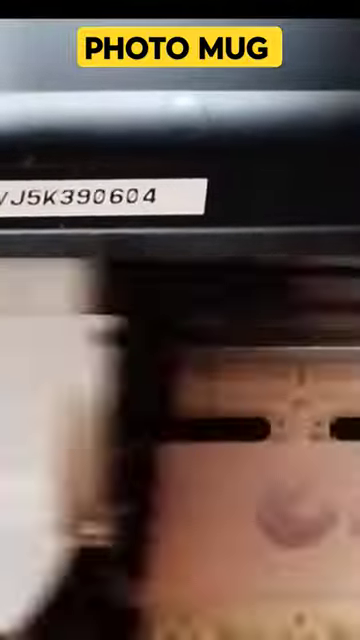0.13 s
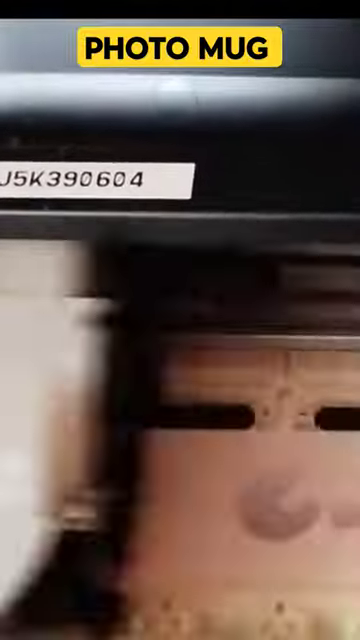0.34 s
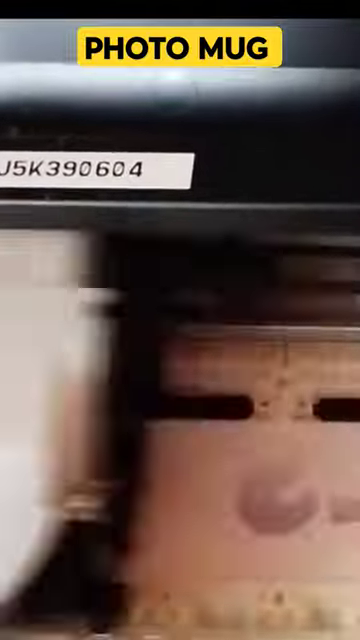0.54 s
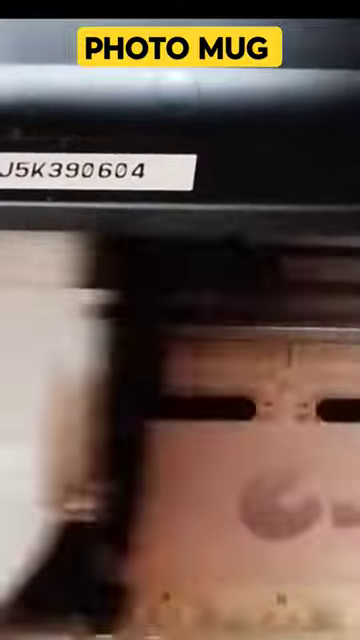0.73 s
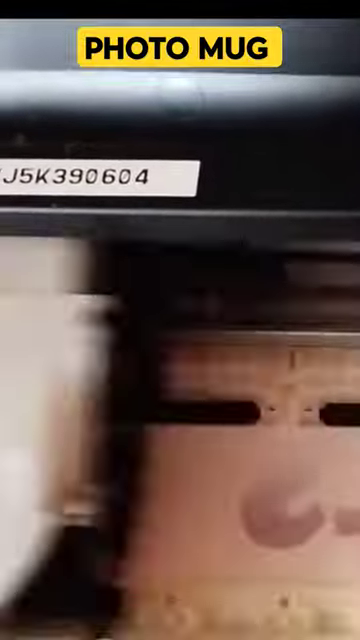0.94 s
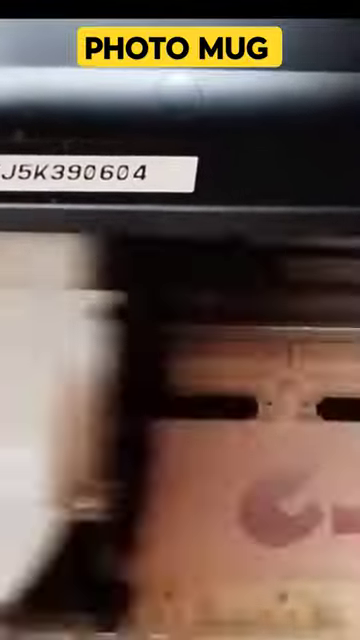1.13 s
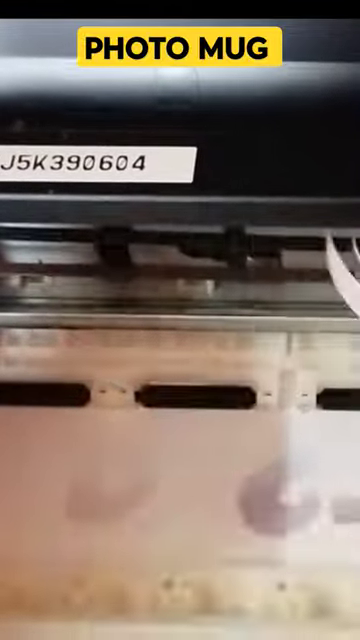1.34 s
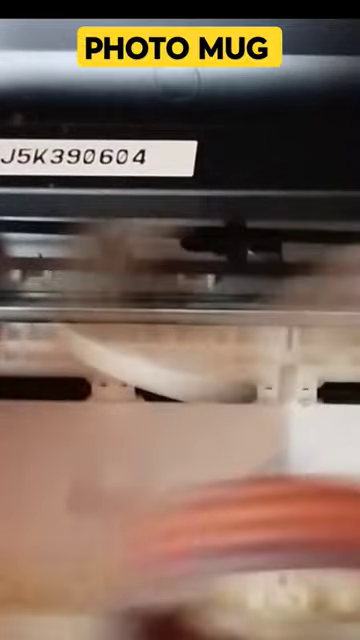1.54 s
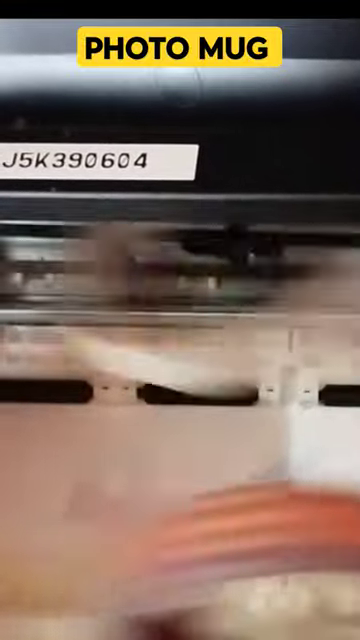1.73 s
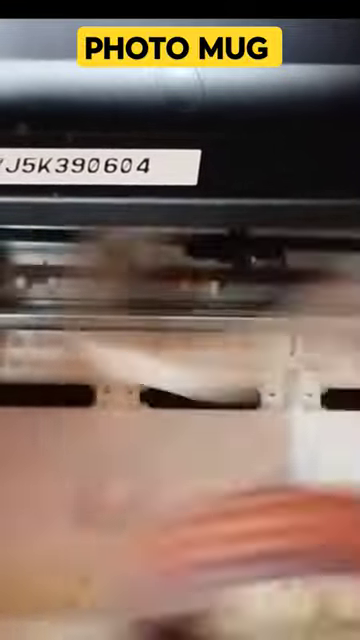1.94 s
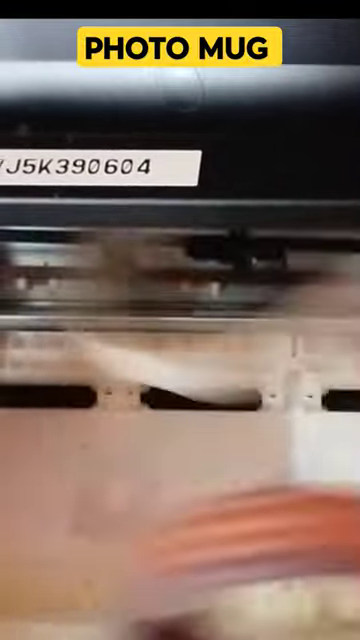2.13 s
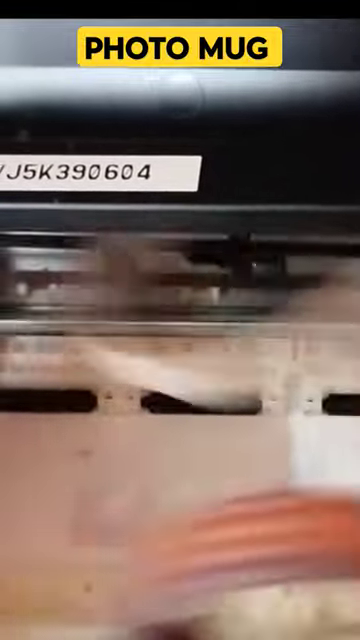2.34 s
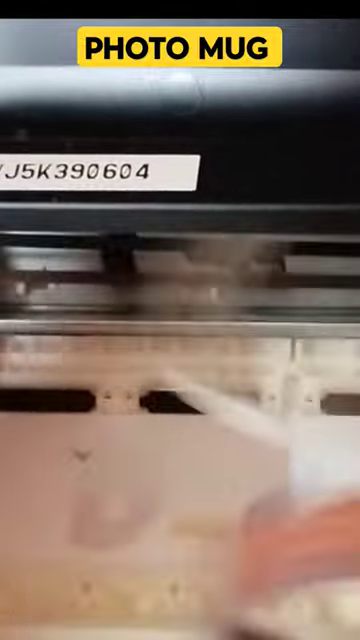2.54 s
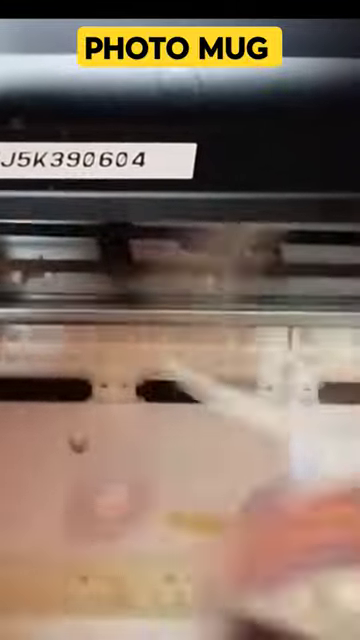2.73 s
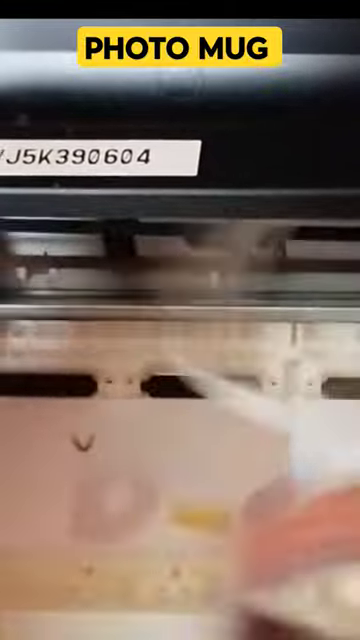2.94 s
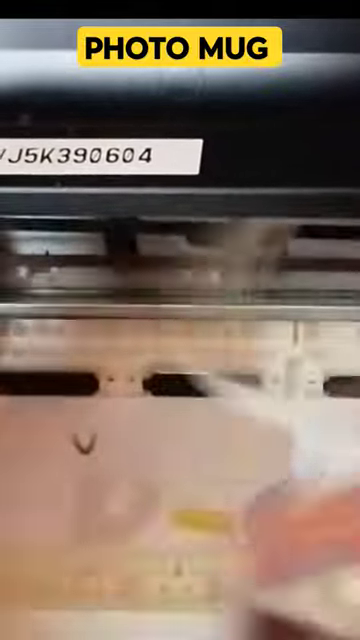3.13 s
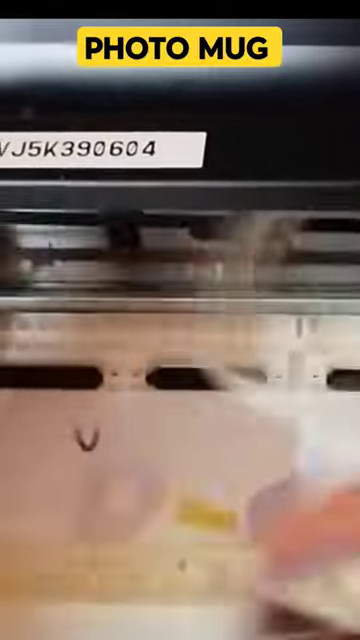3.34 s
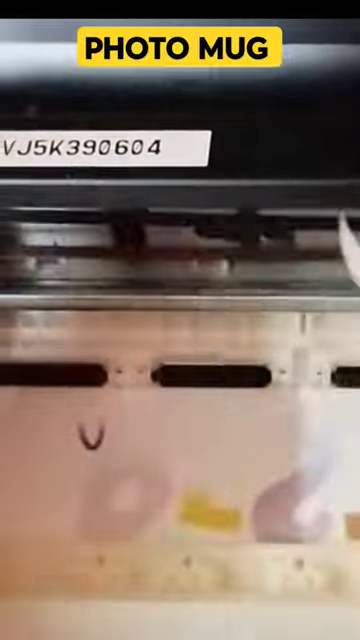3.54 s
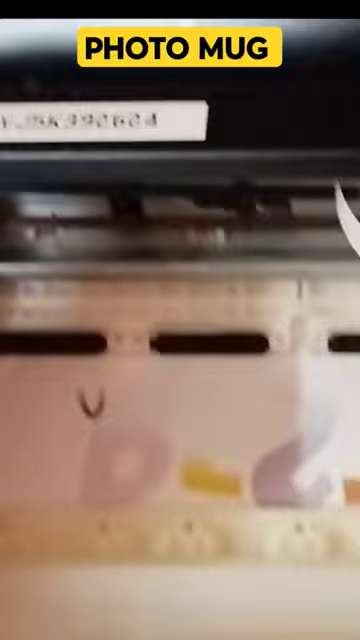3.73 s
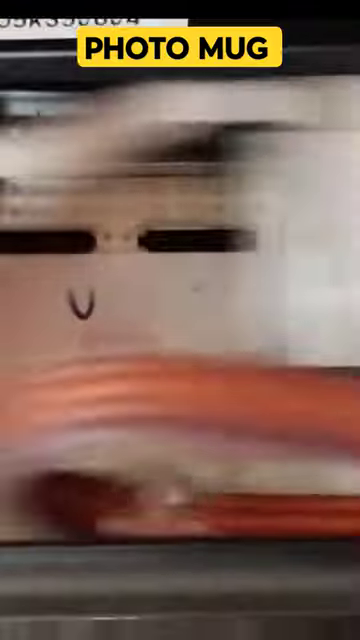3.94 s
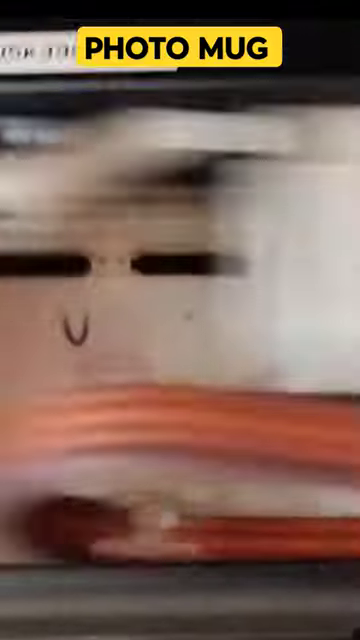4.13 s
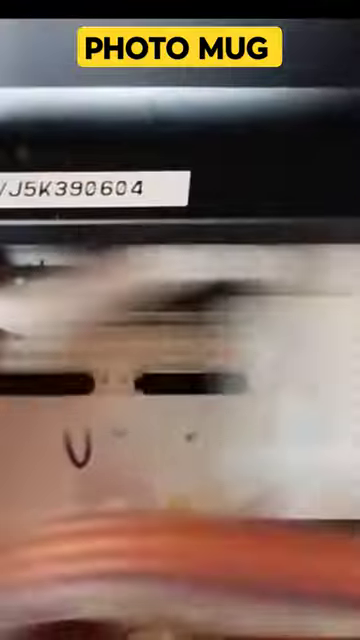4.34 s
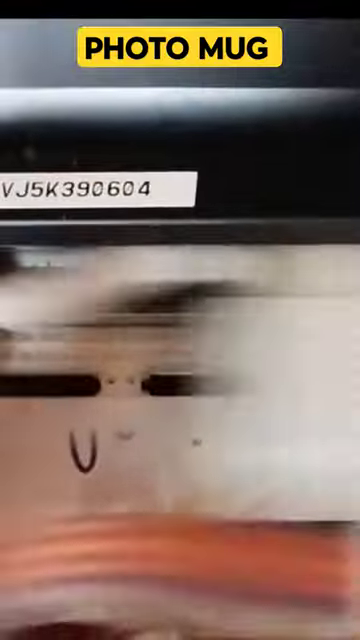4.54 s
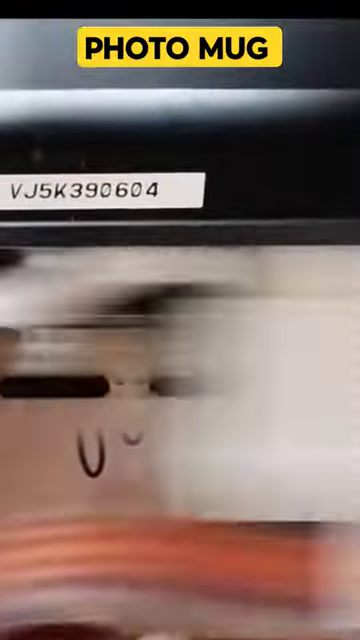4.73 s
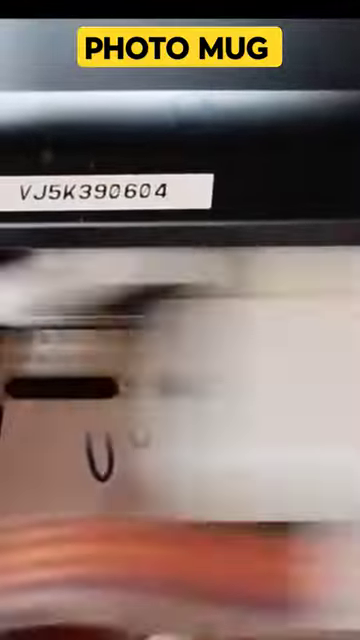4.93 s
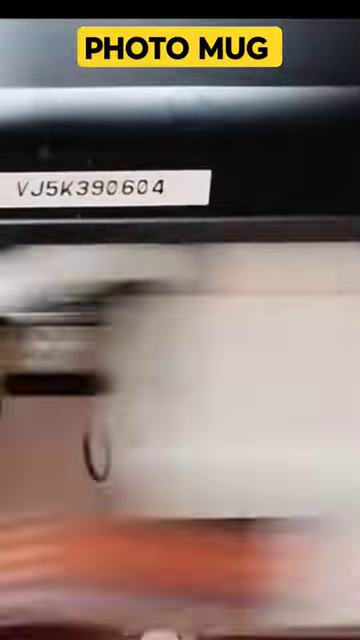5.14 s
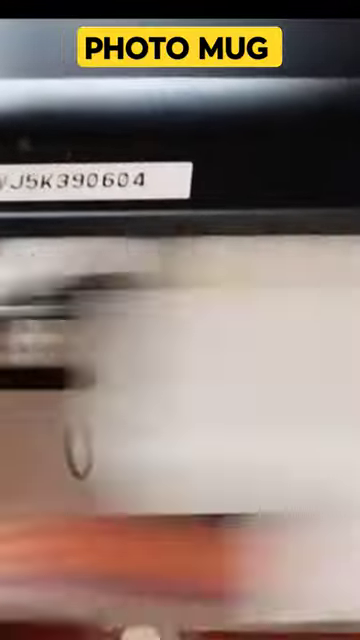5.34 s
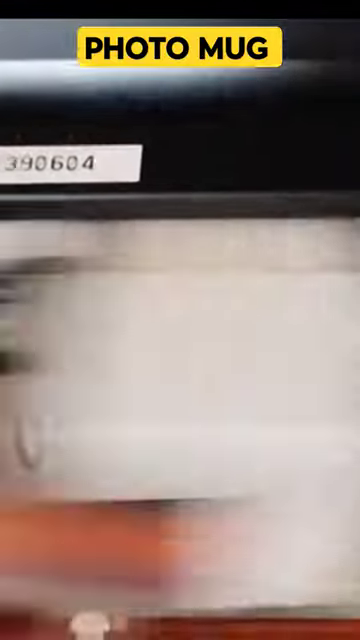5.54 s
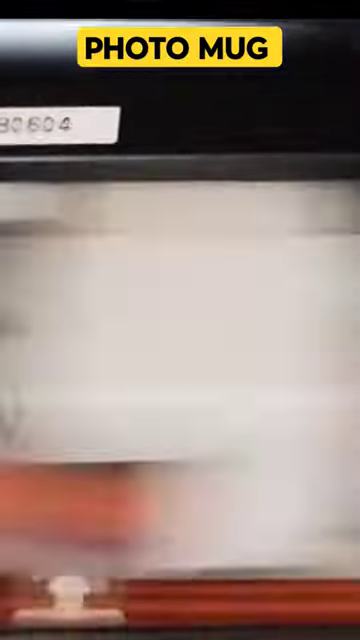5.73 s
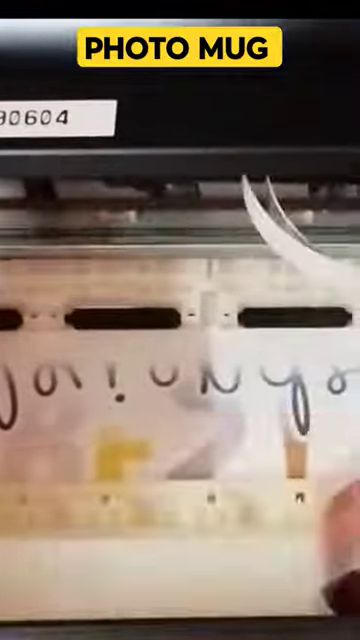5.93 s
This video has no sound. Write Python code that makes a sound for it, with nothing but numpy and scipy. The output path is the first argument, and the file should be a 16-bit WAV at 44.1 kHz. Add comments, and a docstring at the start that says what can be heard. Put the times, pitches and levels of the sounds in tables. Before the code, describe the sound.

Close, fast, even clatter of a printer carriage, with belt hum and thin gear whine, stopping briefly twice.

```python
"""Close beside a sped-up inkjet printer: clacking, whirring strokes, ten a second, in three runs.
At each reversal the carriage clacks across its play, then rattles as the belt jerks it up to speed.
Under way the belt teeth hum, the gears sing, the carriage rubs along its rail and the frame rumbles.
The treble has a fine ripple, and a dull room tail and faint idle noise fill the short pauses."""
import sys
import numpy as np
from scipy import signal
from scipy.fft import rfft, irfft, next_fast_len
from scipy.io import wavfile
from scipy.ndimage import uniform_filter1d

SR = 44100
rng = np.random.default_rng(int(sys.argv[2]) if len(sys.argv) > 2 else 0)


def store_wav(level_fs):
    """Save 16-bit WAV to argv[1]."""
    pcm = np.round(np.clip(np.atleast_2d(level_fs), -1, 1) * 32767)
    wavfile.write(sys.argv[1], SR, pcm.T.astype(np.int16))


N = 264159
TIME = np.arange(N) / SR
BRAKING_S = .06  # no reversal this close to a stop: the last stroke runs on

# Print runs: start t/s, stop t/s, stroke length/s, effort/dB, easing off/dB,
# crack/dB re the clack's strike, jerk/dB re effort
RUNS = [(-.1435, 1.502, 0.1, -39.5, 5, -5, -1.5), (1.7194, 3.773, .10055, -40, 2.5, -3, -1.5),
        (3.9925, 6.45, .1011, -40.5, -1, -1.5, -0.5)]


def strokes(jerk_spread_db=1.0):
    """Even strokes, a return first. Rows: start t/s, end t/s, 1 if returning, crack/dB, jerk/dB."""
    rows = []
    for start, stop, stroke_s, _, _, crack_db, jerk_db in RUNS:
        turns = np.arange(start, stop - BRAKING_S, stroke_s)
        ends = np.r_[turns[1:], stop]
        rows += [(turns[k], ends[k], (k + 1) % 2, crack_db, jerk_db) for k in range(len(turns))]
    rows = np.array(rows)
    rows[:, -1] += rng.standard_normal(len(rows)) * jerk_spread_db
    return rows


def effort(soft_start_db=6, soft_start_s=0.052, ease_s=0.45):
    """How hard the drive works, in dB: runs start softly; two ease off at the end, the last pushes on."""
    out = np.zeros(N)
    for start, stop, _, level_db, ease_db, _, _ in RUNS:
        building = np.exp(-np.maximum(TIME - start, 0) / soft_start_s)
        easing = np.clip(1 - (stop - TIME) / ease_s, 0, 1)
        run_db = level_db - soft_start_db * building - ease_db * easing
        out = np.where(TIME > start - BRAKING_S, run_db, out)
    return out


def motion(rows, ramp_s=0.018, slip_s=.00012):
    """The carriage's travel: position (0-1 out, 1-2 back), share of the stroke, moving gate, track spot."""
    starts, ends, returning, _, _ = rows.T
    stroke = np.maximum(np.searchsorted(starts, TIME, side="right") - 1, 0)
    age = TIME - starts[stroke]
    share = np.clip(age / (ends - starts)[stroke], 0, 1)
    moving = sum(np.clip(np.minimum(TIME - start, stop - TIME) / ramp_s + .5, 0, 1)
                 for start, stop, *_ in RUNS)
    # sample index into the track's roughness: one stretch per direction, never met quite on time
    spot = (np.abs(age + returning[stroke] + slip_s * drift(12)) * SR).astype(int)
    return returning[stroke] + share, share, moving, spot


# Accented reversals: t/s, strike level/dB, rebound level/dB
ACCENTS = [(0.0565, -37.5, -46), (.158, -25.5, -35), (0.357, -30.5, -35), (.6574, -31, -45.5),
           (0.758, -30.5, -39), (0.8575, -26.5, -34.5), (0.958, -31.5, -49), (1.058, -31, -36),
           (1.2594, -41, -39.5), (1.72, -43.5, -46), (1.8222, -33.5, -40), (1.9215, -40, -35.5),
           (2.0218, -33.5, -36), (2.4234, -39.5, -41.5), (2.524, -31.5, -38), (2.7255, -32.5, -39),
           (2.825, -37.5, -37), (2.9269, -31.5, -38), (3.0262, -31, -40.5), (3.1274, -33, -38.5),
           (3.2272, -33, -39), (3.3292, -27, -38), (3.4292, -26.5, -40), (3.53, -27, -40.5),
           (3.63, -37.5, -39.5), (3.9922, -38.5, -54), (4.095, -38.5, -40), (4.1957, -37, -38.5),
           (4.2966, -39.5, -38), (4.3978, -32, -40), (4.499, -32, -43), (4.5986, -29.5, -43),
           (4.7, -35, -38.5), (4.902, -36.5, -48), (5.003, -42, -37), (5.1056, -27.5, -37),
           (5.2071, -29.5, -38), (5.309, -28, -32), (5.4088, -40, -38), (5.5099, -37, -32),
           (5.6097, -37, -35), (5.7111, -34, -28.5), (5.8105, -36, -40), (5.9123, -34.5, -31.5)]
# The carriage clicking home after the second run: t/s, level/dB
HOME_CLICKS = [(3.766, -38), (3.7712, -52)]
# Bright ring of the carriage plastic: f/Hz, width/Hz, level/dB
CLACK_MODES = [(7810, 560, 0), (8780, 460, 0.5), (9900, 560, 0), (11000, 510, -1.5)]
# EQ of the dry crack: f/Hz, level/dB
CRACK_EQ = [(300, -12), (1800, 5.5), (2700, 1), (3700, 4.5), (4900, 2), (6000, 2.5), (8000, 4.5),
            (15000, 0)]
# EQ of the rebound: f/Hz, level/dB
REBOUND_EQ = [(300, -7.5), (800, -1.5), (1700, 1), (2400, 2.5), (3400, 7), (4800, 0.5), (6000, 3),
              (10000, -3.5), (12500, -2.5), (15000, -8)]


def clacks(turns, effort_db, spread_db=4.5, rebound_s=0.0055, settle_s=0.0165):
    """At each reversal the carriage snaps across its play, rebounds and, on the way back, settles."""
    times, _, returning, crack_db, _ = turns.T.copy()
    back = returning > 0
    drive_db = np.interp(times, TIME, effort_db)
    chance_db = rng.standard_normal((len(times), 2)) * spread_db
    strike_db = drive_db - 7.5 + chance_db[:, 0]
    rebound_db = drive_db - 7 + chance_db[:, 1]
    for accent in ACCENTS:  # each takes the place of the nearest soft clack
        k = np.argmin(abs(times - accent[0]))
        times[k], strike_db[k], rebound_db[k] = accent
    hits = times - .0001
    strike = noise() * bursts(hits, strike_db + 0.5, hold_s=0.0023, decay_s=0.0011, rise_s=0.0008)
    crack = noise() * bursts(hits, strike_db + crack_db, hold_s=0.0023, decay_s=0.0016, rise_s=0.00043)
    home = noise() * bursts(*np.transpose(HOME_CLICKS), hold_s=0.0017, decay_s=0.00074)
    rebound = noise() * bursts(times + rebound_s, rebound_db + 0.2,
                               hold_s=0.003, decay_s=0.0022, rise_s=0.0019)
    settle = noise() * bursts(times[back] + settle_s, drive_db[back], hold_s=0.0009, decay_s=0.0012)
    ringing = ring(strike + settle, CLACK_MODES)
    snaps = colour(crack + settle + home, CRACK_EQ) + colour(rebound, REBOUND_EQ)
    return treble_ripple(low_cut(ringing + snaps), wet_db=-7)


# Heavy jolts as the belt snatches or brakes the carriage: t/s, level/dB
JOLTS = [(.084, -37.5), (.184, -34), (.283, -38), (.484, -36), (.585, -33.5), (.685, -37), (.786, -30),
         (0.884, -37), (0.986, -30.5), (1.084, -33.5), (1.386, -32.5), (1.475, -36), (1.495, -48),
         (1.85, -33.5), (2.149, -35), (3.748, -43), (3.766, -40), (5.536, -42), (5.738, -37), (5.937, -36)]
# EQ of a hard jolt: f/Hz, level/dB
JOLT_EQ = [(150, -26.5), (330, 1), (800, 2), (1200, -0.5), (1750, 11), (3200, 1), (7000, -11),
           (15000, -14.5)]
# EQ of the duller rattle on every stroke: f/Hz, level/dB
JERK_EQ = [(150, -25.5), (330, 4.5), (600, 3.5), (780, 9.5), (1200, 0.5), (1750, 4.5), (3200, -5),
           (7000, -13), (15000, -24.5)]


def jerks(turns, effort_db, spot, taut_s=0.0219, outward_db=3, grain_db=1.5):
    """After each reversal the belt pulls taut and the carriage rattles; now and then it jolts hard."""
    times, _, returning, _, jerk_db = turns.T
    back = returning > 0
    jerk_db = jerk_db + np.interp(times, TIME, effort_db) + outward_db * ~back
    jerk = bursts(times + taut_s, jerk_db - 2, hold_s=0.0072, decay_s=0.0045, rise_s=0.0052)
    # the outward stroke ends with a dull bump
    arrival = bursts(times[back] - .004, jerk_db[back] - 1, hold_s=0.0083, decay_s=0.0053, rise_s=0.0029)
    # halfway back the carriage runs over a small unevenness
    midway = bursts(times[back] + 0.0536, jerk_db[back] - 15.5,
                    hold_s=.004, decay_s=0.0055, rise_s=0.0025)
    jolt = bursts(*np.transpose(JOLTS), hold_s=0.0018, decay_s=0.0033, rise_s=0.00097)
    rattle = retraced(noise() * from_db(grain_db * drift(700)), spot)
    knocks = colour((jerk + arrival + midway) * rattle, JERK_EQ) + colour(jolt * noise(), JOLT_EQ)
    return treble_ripple(low_cut(knocks), wet_db=-5)


def belt_load(position, share):
    """Hum level in dB: it dips at the turn, as the belt slackens, and as the carriage coasts."""
    back = position > 1
    turn = bell(share, np.where(back, 0.14, 0.18), 0.066)
    slack = bell(share, np.where(back, 0.44, 0.42), np.where(back, 0.14, 0.069))
    coast = bell(share, np.where(back, 0.9, 0.73), np.where(back, 0.06, 0.095))
    return -2.4 - 12 * turn - 16 * slack - 6 * coast


# Carriage speed through a stroke: place/strokes, speed/full speed
SPEED_CURVE = [(0, .985), (.25, .96), (.45, .995), (.62, 1.0), (.85, 1.003), (1, .985)]
# Whine over the belt hum: harmonic number, level/dB re effort, from/strokes, to/strokes
BELT_WHINE = [(5, -9.5, 0.35, 1.05), (5, -20, 1, 2.1)]


def belt(position, share, tooth_hz=492.3, waver=0.003, flutter_db=1, rise_db_per_s=0.4):
    """Belt teeth meeting the pulley give a clean hum and a thin whine that grows as the print goes on."""
    speed = np.interp(share, *np.transpose(SPEED_CURVE))
    phase = phase_of(tooth_hz * speed * (1 + waver * drift(150)))
    out = from_db(belt_load(position, share)) * tone(phase + 0.15 * drift(70))
    rise_db = rise_db_per_s * (TIME - TIME.mean())
    for harmonic, level_db, begin, end in BELT_WHINE:
        gain = swell(position, begin, end) * from_db(level_db + rise_db + flutter_db * drift(150))
        out += gain * tone(harmonic * phase)
    return out


# Gliding notes of motor and gears: first f/Hz, last f/Hz, level/dB re effort, from/strokes, to/strokes
GEAR_NOTES = [(420, 323, -9, 0.25, 0.416), (364, 316, -14.5, .47, .72), (450, 309, -7, 1.14, 1.44),
              (763, 808, -7, .2, .38), (785, 850, -9, .66, 1.018), (1875, 1845, -7, 0.17, .55),
              (1737, 1712, -5, .35, 0.69), (1776, 1785, -2.5, .71, 0.827), (1839, 1900, -6, .88, 1.1),
              (1790, 1700, -9.5, 1.86, 2.076), (2790, 2720, -13.5, .7, 1.15), (3104, 3200, -10, .72, 1.13),
              (4700, 4850, -14.5, .24, 0.48), (4840, 4920, -15, 1.3, 1.8), (4890, 4925, -9, 1.77, 1.864),
              (7200, 7450, -12, 1.37, 1.614)]


def gears(position, pitch_wander=0.0041):
    """Motor and gears sing the same glides at the same places on every trip; high notes are roughest."""
    wander = 1 + pitch_wander * drift(18)
    out = np.zeros((2, N))
    for first_hz, last_hz, level_db, begin, end in GEAR_NOTES:
        flutter = from_db(1.8 * drift(90) - .2)
        phase_jitter = .22 * first_hz / 1000 * drift(380)
        place, length = (position - begin) % 2, end - begin
        on = np.flatnonzero(place < length)
        hz = np.interp(place[on], [0, length], [first_hz, last_hz]) * wander[on]
        cycles = np.cumsum(hz) / SR
        new_trip = np.diff(on, prepend=0) > 1
        cycles -= np.maximum.accumulate(cycles * new_trip)  # the phase restarts on every trip
        gain = from_db(level_db) * swell(place[on], 0, length, edge=0.044) * flutter[on]
        out[:, on] += gain * tone(2 * np.pi * cycles + phase_jitter[on])
    return low_cut(out)


# EQ of the carriage rubbing on its rail: f/Hz, level/dB
RUB_EQ = [(150, -12.5), (400, -0.5), (770, 1), (1150, 1.5), (1750, 5.5), (2100, 2.5), (2600, 2),
          (3250, 3.5), (4000, 0), (4900, -0.5), (5800, -5.5), (7200, -4), (8200, -7), (15500, -7.5)]
# EQ of the airy hiss on the way back: f/Hz, level/dB
HISS_EQ = [(3000, -18), (6000, 11.5), (11000, 6), (13300, 15.5), (15500, -13.5)]


def rail(position, share, spot, hiss_rise_db_per_s=0.16, flicker_db=1.5):
    """Grainy, juddering friction that dips after each turn, with a hiss strongest on the return."""
    rub_db = -6 - 2 * bell(share, 0.21, 0.09) + 0.05 * swell(position, 1, 2.5)
    grain = from_db(2.5 * drift(900) + 1.5 * drift(110))
    rub = colour(retraced(noise() * grain, spot) * from_db(rub_db), RUB_EQ)
    hiss = colour(retraced(noise(), spot), HISS_EQ)
    hiss_db = -11.5 + hiss_rise_db_per_s * (TIME - TIME.mean()) + flicker_db * drift(30)
    return treble_ripple(rub + hiss * from_db(hiss_db) * bell(position, 1.54, 0.6), wet_db=-5)


# Low body of the frame: f/Hz, width/Hz, level/dB
FRAME_MODES = [(229.8, 9.6, -6), (311.6, 22.3, 1.5), (367.6, 15, 0.5), (452, 34.5, 1), (542.4, 28, 1),
               (764, 75, -2), (977, 35, -12)]


def frame(share, spot, rumble_db=-11.5, shake_db=8):
    """The moving mass shakes the frame's resonances, most while the carriage gathers speed."""
    rumble = rms_one(low_cut(ring(retraced(noise(), spot), FRAME_MODES)))
    return from_db(rumble_db + shake_db * bell(share, 0.18, 0.2)) * rumble


def run_down(hz=2410, width_hz=45, level_db=-59, decay_s=0.03, sag_per_s=0.53):
    """After the first run a rough whine lingers briefly and sinks a little."""
    age = np.maximum(TIME - RUNS[0][1], 0)
    envelope = from_db(level_db) * (age > 0) * np.exp(-age / decay_s)
    return envelope * resonance(hz * np.exp(-sag_per_s * age), width_hz)


# Hums of the idling machine: f/Hz, width/Hz, level/dB
IDLE_HUMS = [(244, 11, -74.5), (695, 16, -78), (795, 24, -71.5)]
# EQ of the idle noise bed: f/Hz, level/dB
IDLE_EQ = [(25, -21), (160, -17), (280, -2), (550, -8), (900, -4.5), (1150, -12), (2500, -16),
           (4500, -24.5), (15000, -26)]


def idle(hiss_db=-66):
    """The idling machine: faint hums over a dull hiss."""
    hums = sum(from_db(level_db) * resonance(hz, width_hz) for hz, width_hz, level_db in IDLE_HUMS)
    return hums + from_db(hiss_db) * colour(noise(), IDLE_EQ)


def treble_ripple(x, wet_db, decay_s=0.005, above_hz=2200):
    """Very short random echoes give the treble a fine ripple, different in each channel."""
    age = np.arange(SR // 20) / SR
    echoes = rng.standard_normal((2, len(age))) * np.exp(-age / decay_s)
    echoes = signal.sosfilt(signal.butter(2, above_hz, "high", fs=SR, output="sos"), echoes)
    echoes *= from_db(wet_db) / np.linalg.norm(echoes, axis=1, keepdims=True)
    return x + signal.fftconvolve(x, echoes, axes=1)[:, :N]


def room(x, send_db=-23, t60_s=0.38, dull_hz=3000):
    """A faint, dull room tail, heard as it fades in the pauses."""
    age = np.arange(SR // 3) / SR
    echoes = rng.standard_normal((2, len(age))) * from_db(-60 * age / t60_s)
    echoes *= from_db(send_db) / np.linalg.norm(echoes, axis=1, keepdims=True)
    echoes = signal.sosfilt(signal.butter(2, dull_hz, fs=SR, output="sos"), echoes)
    return x + signal.fftconvolve(x, echoes, axes=1)[:, :N]


# Stereo width: f/Hz, side minus mid/dB
STEREO_WIDTH = [(50, -1.5), (300, -17.5), (700, -14.5), (1500, -9), (2800, -6), (5000, -1), (15000, 0.5)]
# Stereo balance: f/Hz, left minus right/dB
STEREO_LEAN = [(600, -0.9), (1400, 0.7), (3100, 0), (6000, -1.5), (10000, -2), (14000, 2)]


def stereo(pair):
    """Mid and side become left and right: narrow in the low mids, wide in the treble."""
    size = 2 * (N // 2 + 1)
    hz = np.fft.rfftfreq(size, 1 / SR)
    mid, side = rfft(pair, size)
    side = side * from_db(at_hz(STEREO_WIDTH, hz))
    lean = from_db(at_hz(STEREO_LEAN, hz) / 2)
    return irfft(np.array([(mid + side) * lean, (mid - side) / lean]))[:, :N]


def retraced(x, spot, repeating=0.7):
    """Part of a roughness belongs to the track and returns on every trip; the rest is new each time."""
    return np.sqrt(repeating) * x[:, ::-1][:, spot] + np.sqrt(1 - repeating) * x


def bursts(times, levels_db, hold_s, decay_s, rise_s=0.0004):
    """Envelope of contacts that close, chatter for a moment and then die away."""
    envelope, age = np.zeros(N + SR // 10), np.arange(SR // 10) / SR
    shape = np.minimum(age / rise_s, 1) * np.exp(-np.maximum(age - hold_s, 0) / decay_s)
    for onset_s, gain in zip(times, from_db(levels_db)):
        start = min(int(onset_s * SR), N)
        envelope[start:start + len(age)] += gain * shape
    return envelope[:N]


def ring(x, modes):
    """Parallel resonances; white noise roughly keeps its power."""
    out, power = 0, 0
    for k, (hz, width_hz, level_db) in enumerate(modes):
        b, a = signal.iirpeak(hz, hz / width_hz, fs=SR)
        out = out + (-1) ** k * from_db(level_db) * signal.lfilter(b, a, x + 1e-18)
        power += from_db(level_db) ** 2 * np.pi * width_hz / SR
    return out / np.sqrt(power)


def resonance(hz, width_hz):
    """A resonance shaken at random: strength and phase wander as fast as its width allows."""
    phase = phase_of(hz)
    in_phase = drift(1.5 * width_hz) * tone(phase)
    quadrature = drift(1.3 * width_hz) * tone(phase + np.pi / 2)
    return (in_phase + quadrature) / np.sqrt(2)


def colour(x, eq):
    """Minimum-phase EQ that keeps the power of white noise."""
    size = next_fast_len(N + 8192, real=True) // 2 * 2
    gain = rms_one(from_db(at_hz(eq, np.fft.rfftfreq(size, 1 / SR))))
    cepstrum = irfft(np.log(gain))
    cepstrum[1:size // 2] *= 2
    cepstrum[size // 2 + 1:] = 0
    return irfft(rfft(x, size) * np.exp(rfft(cepstrum)))[..., :N]


def low_cut(x, hz=225):
    """Small plastic parts radiate little bass."""
    return signal.sosfilt(signal.butter(4, hz, "high", fs=SR, output="sos"), x)


def at_hz(curve, hz):
    """A curve read on a log-frequency axis."""
    knots_hz, values = np.transpose(curve)
    return np.interp(np.log(np.maximum(hz, 1)), np.log(knots_hz), values)


def drift(rate):
    """Smooth random motion of RMS 1 that changes about rate times a second."""
    knots = rng.standard_normal(8192)
    return rms_one(uniform_filter1d(np.interp(TIME * rate, np.arange(len(knots)), knots), size=32))


def swell(position, begin, end, edge=0.11):
    """Fades in and out over one stretch of the trip."""
    return np.clip(np.minimum(position - begin, end - position) / edge, 0, 1)


def bell(place, centre, width):
    """A bell of height 1 around one place in the trip."""
    return np.exp(-((place - centre) / width) ** 2)


def tone(phase):
    """A sine of RMS 1, with mid and side a quarter cycle apart."""
    return np.sqrt(2) * np.array([np.sin(phase), np.cos(phase)])


def phase_of(hz):
    return 2 * np.pi * np.cumsum(hz * np.ones(N)) / SR


def noise():
    return rng.standard_normal((2, N))


def from_db(db):
    return 10 ** (np.asarray(db) / 20)


def rms_one(x):
    return x / np.sqrt(np.mean(x ** 2) + 1e-20)


def scene():
    """The shuttling carriage and its knocks, over the idling machine."""
    rows, effort_db = strokes(), effort()
    position, share, moving, spot = motion(rows)
    running = frame(share, spot) + rail(position, share, spot) + belt(position, share) + gears(position)
    carriage = moving * from_db(effort_db) * running
    turns = rows[rows[:, 0] > 0]  # the first run is already under way at 0 s
    knocks = clacks(turns, effort_db) + jerks(turns, effort_db, spot)
    return stereo(room(carriage + knocks) + run_down() + idle())


def record(dry, cutoff_hz=15400):
    """A steep low-pass takes off the very top."""
    return signal.sosfilt(signal.ellip(10, .2, 80, cutoff_hz, fs=SR, output="sos"), dry)


dry = scene()
out = record(dry)
store_wav(out)
```